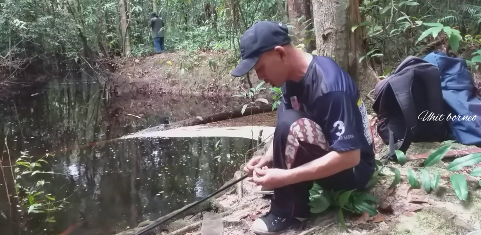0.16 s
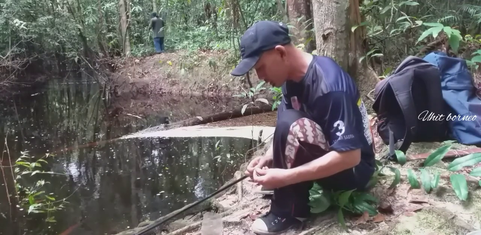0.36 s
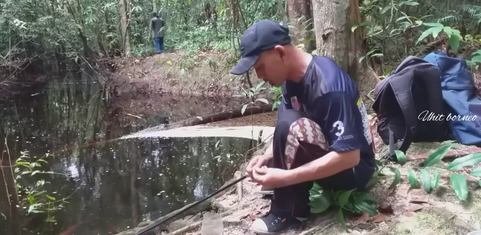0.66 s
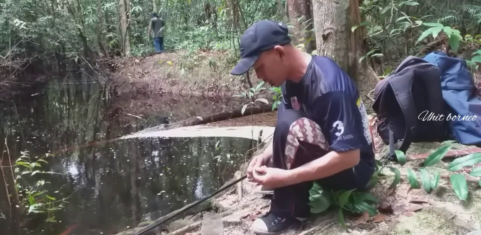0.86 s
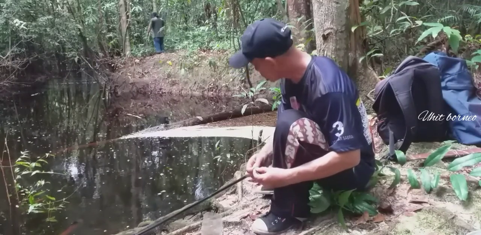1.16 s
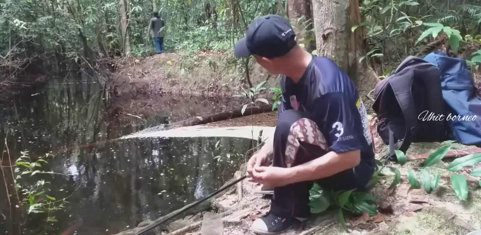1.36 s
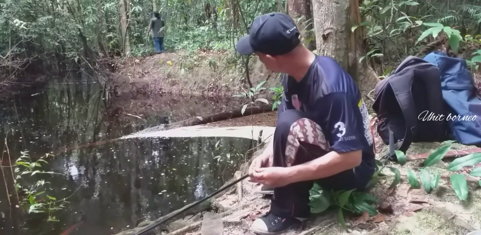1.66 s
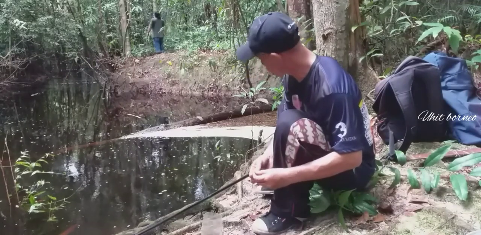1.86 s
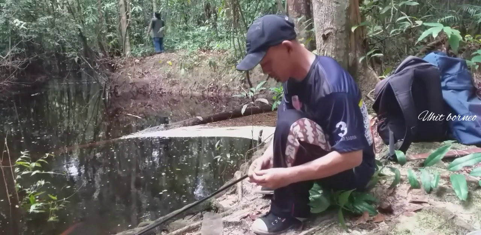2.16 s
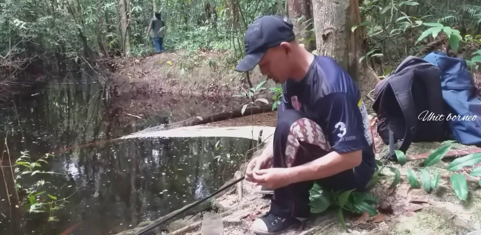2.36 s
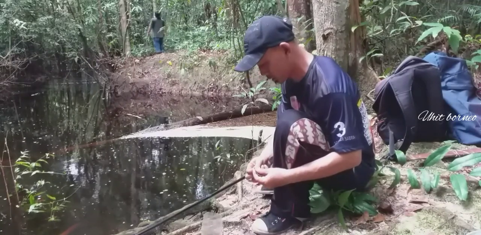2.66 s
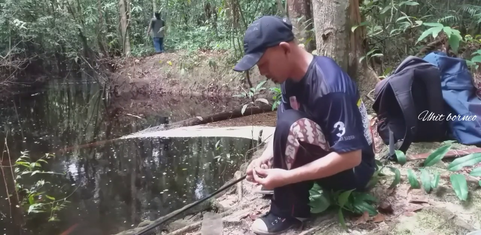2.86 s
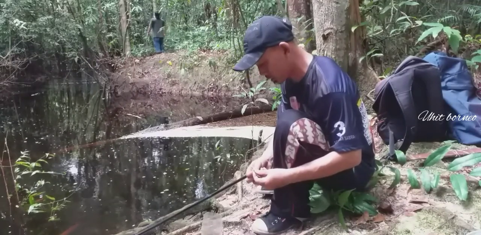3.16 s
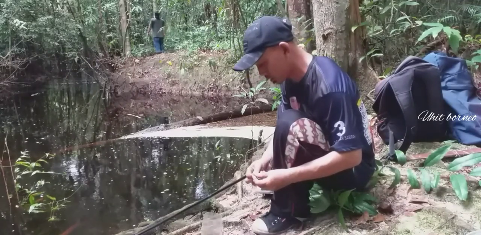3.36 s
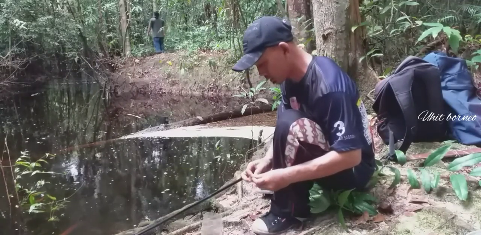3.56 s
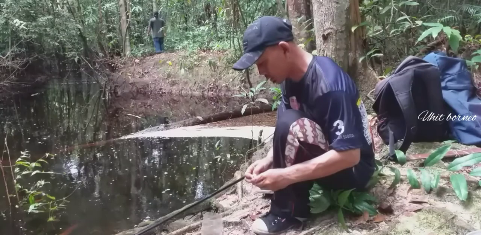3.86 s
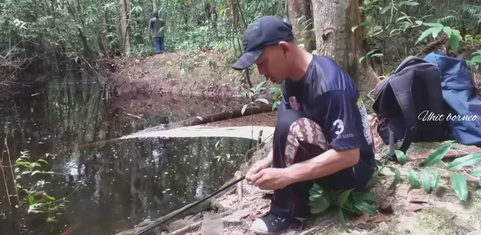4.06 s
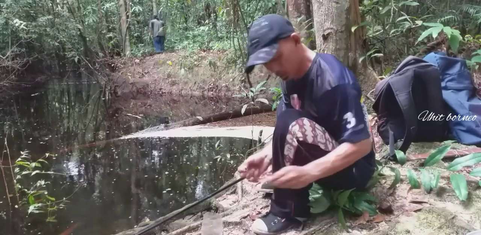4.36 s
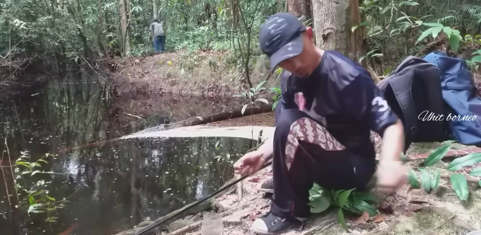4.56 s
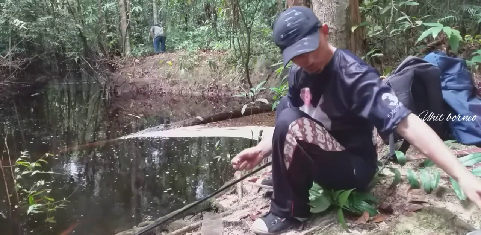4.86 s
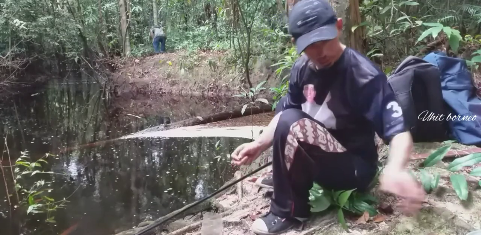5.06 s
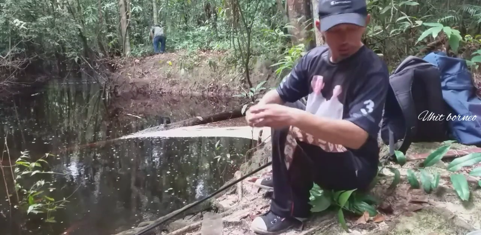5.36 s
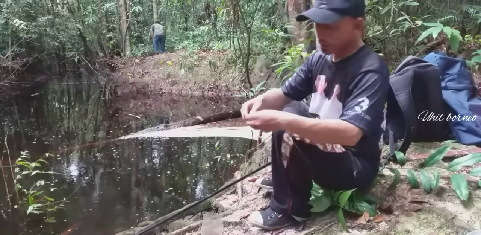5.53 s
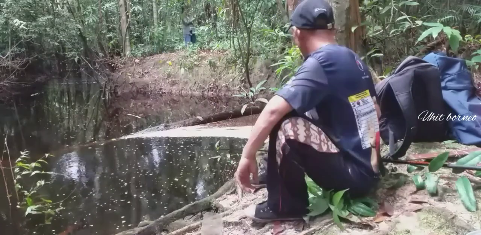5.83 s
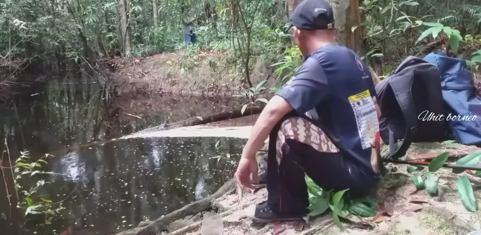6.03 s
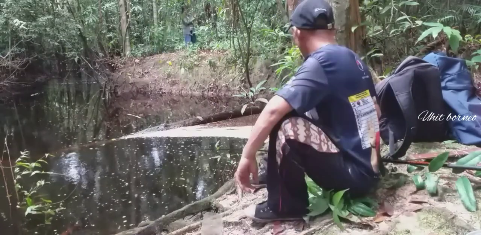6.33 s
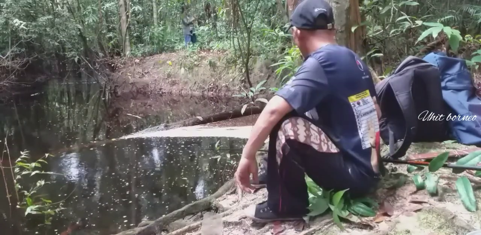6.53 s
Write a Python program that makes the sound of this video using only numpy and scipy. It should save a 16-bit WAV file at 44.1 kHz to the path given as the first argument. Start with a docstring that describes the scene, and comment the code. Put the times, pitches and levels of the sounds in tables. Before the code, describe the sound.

A shrill cicada chorus rings steadily for the whole six and a half seconds, a dense, faintly buzzing hiss around 6 to 7 kHz with a weaker overtone above, over barely audible low rumble and wash. Far, blurred bird notes and light leaf rustling hide beneath it from the start, and a tiny gulp glides upward at 0.35. A bush cricket makes four soft, very high rasps at about 1.2, 1.6, 2.0 and 2.4. A near bird chirps at 1.95 to 2.1, one slur down and two quick flicks up, echoed by the trees. A thin insect whines almost inaudibly near 3.9 and from 6.3. At 4.9 two sharp ticks open a short, bright splash that turns hollow, with small ringing bubbles until about 5.0. Scattered ticks follow, with a snap and dry leaf crackle near 5.4, and a last faint tick at 5.8. The chorus eases very slightly at the end.

```python
"""A cicada chorus drones as ringing click noise over rumble and wash; leaves rustle as fine crackle.
Far birds call in blurred notes from the start, and a low sine gulp glides up from a still pond.
A bush cricket then rasps four times in sliding noise, damped snaps tick, a near bird chirps in three sine slurs.
A thin insect whines twice in fuzzy noise; between, droplet crackle and ringing bubbles splash.
Trees echo the water, leaves, birds and bush cricket; opposed faint hiss widens a nearly mono pair."""
import sys
import numpy as np
from scipy import signal
from scipy.fft import rfft, irfft
from scipy.io import wavfile
from scipy.ndimage import uniform_filter1d

SR = 44100
rng = np.random.default_rng(int(sys.argv[2]) if len(sys.argv) > 2 else 0)


def log_audio(samples):
    """Write samples as a 16-bit WAV file to the path given in sys.argv[1]."""
    # one column per channel
    frames = np.atleast_2d(samples).T
    # limit to full scale, then quantise
    limited = np.clip(frames, -1, 1)
    pcm = np.round(limited * 32767).astype(np.int16)
    wavfile.write(sys.argv[1], SR, pcm)


N = 295029
TIME_S = np.arange(N) / SR

# Low forest rumble and faint wash: (frequency [Hz], relative density [dB])
AIR_SPECTRUM = [(15, -52), (25, -30), (38, -12), (91, 1), (182, -7.5), (217, -14.5), (247, -12), (328, -15),
                (736, -17.5), (876, -18.5), (1650, -20), (2290, -19.5), (2440, -20), (4600, -19),
                (5980, -51), (10100, -120)]
# Cicadas' ringing tymbals: (frequency [Hz], relative density [dB])
TYMBAL_SPECTRUM = [(2710, -58), (4600, -38), (5090, -28.5), (5460, -25), (6290, -1.5), (6700, 3),
                   (7010, -2), (7470, -9), (8310, -18), (8770, -23.5), (9460, -41), (9800, -35),
                   (12700, -75), (21600, -120)]
# Tymbal overtone an octave up: (frequency [Hz], relative density [dB])
OVERTONE_SPECTRUM = [(5590, -56), (9500, -27.5), (10200, -29), (11100, -25.5), (12500, -5), (13200, 2.5),
                     (14000, -2), (15600, -20.5)]
# Effort of the whole chorus: (time [s], level [dB])
CHORUS_EFFORT = [(1.0, -46), (2.9, -45), (5.4, -45), (6.3, -46.6)]
# Nearest cicadas: (frequency [Hz], width per filter stage [Hz], level against the ring [dB])
CICADA_DRONES = [(6310, 56, -21.5), (6473, 66, -12.5)]
# Faint side hiss: (frequency [Hz], relative density [dB])
SIDE_HISS_SPECTRUM = [(100, -18), (500, -5.5), (1500, -1), (4000, 2), (6500, -22.5), (10500, 0),
                      (15000, 3.5)]
# Brushes through dry leaves: (loudest time [s], rise and fall scale [s], level [dB])
LEAF_BRUSHES = [(.35, 0.31, -72.5), (1.395, 0.01, -71.5), (1.65, 0.27, -73.5), (3.43, .049, -66),
                (4.8, 0.065, -70), (5.11, .03, -64), (5.398, 0.041, -49.5), (5.52, 0.12, -68)]
# Dry-leaf crackle: (frequency [Hz], relative density [dB])
LEAF_SPECTRUM = [(300, -28), (560, -17.5), (1300, -24), (2100, -9), (3400, -7.5), (4450, -1.5), (6500, -5),
                 (9000, -13.5), (12000, -9.5), (15500, -26)]
# Far bird notes: (start [s], length [s], mid pitch [Hz], width per filter stage [Hz], level [dB])
FAR_BIRD_NOTES = [(0.046, 0.033, 2130, 200, -77), (0.63, 0.09, 740, 219, -73.5),
                  (0.706, 0.074, 1897, 280, -71.5), (1.626, 0.13, 2340, 700, -81),
                  (2.24, 0.075, 4220, 600, -71), (2.939, 0.1, 4450, 1100, -69),
                  (4.853, 0.065, 1790, 130, -69.5), (5.469, .078, 2430, 600, -73)]
# Bush cricket strokes: (start [s], level [dB])
CRICKET_STROKES = [(1.168, -46), (1.637, -46), (1.962, -45.5), (2.44, -45.5)]
# Brief ticks: (start [s], level [dB], ringing frequency [Hz])
TICKS = [(4.9132, -23, 12000), (4.9171, -23, 8300), (4.9193, -29, 8000), (1.395, -58, 4600),
         (3.417, -57, 3200), (4.8015, -51, 9500), (4.9775, -38, 4800), (5.0455, -43, 11000),
         (5.1715, -53, 4700), (5.217, -48, 9000), (5.384, -34, 4500), (5.7998, -51, 2600)]
# Near bird, a slur down and two flicks up; bend > 1 glides late:
# (start [s], length [s], first pitch [Hz], last pitch [Hz], bend [1], swell [s], level [dB])
CHIRP_SLURS = [(1.938, .08, 7470, 6650, 3.5, 0.051, -37.5), (2.009, 0.028, 6680, 7210, 2.5, .008, -35),
               (2.042, 0.056, 7650, 8367, 0.297, 0.0096, -32)]
# Thin insect's songs: (start [s], time to fall-off [s], level [dB])
THIN_SONGS = [(3.85, 0.28, -74), (6.297, .45, -69)]
# Splash slap, closing cavity, slosh, falling drops; depth runs from bright spray to hollow slosh:
# (start [s], rise [s], fall [s], level [dB], depth [0-1])
SPLASH_SURGES = [(4.905, 0.015, 0.013, -39.5, 0.01), (4.926, 0.029, 0.02, -44, 0.64),
                 (4.968, 0.019, 0.056, -58.5, 1), (4.992, .005, 0.0069, -61, .3)]
# Bright spray: (frequency [Hz], relative density [dB])
SPRAY_SPECTRUM = [(200, -42), (1500, -19), (3500, -7), (6000, 5), (11000, -6.5), (15500, -7)]
# Hollow slosh: (frequency [Hz], relative density [dB])
SLOSH_SPECTRUM = [(120, -32), (330, -5.5), (650, -2), (1300, -11.5), (1700, -11), (2500, -7), (5000, -3.5),
                  (8000, -40), (15000, -32)]
# Largest air pockets of the splash: (start [s], starting pitch [Hz], level [dB])
AIR_POCKETS = [(4.909, 1410, -54), (4.911, 3770, -48), (4.937, 586, -51), (4.943, 4420, -41),
               (4.952, 2050, -44.5), (4.955, 1350, -47.5), (4.975, 1208, -49), (4.976, 846, -50.5),
               (4.977, 670, -47), (4.979, 490.6, -54.5), (4.982, 399, -55.5), (4.995, 2800, -53),
               (4.995, 5380, -41.5)]
# Decay of the trees' echoes: (frequency [Hz], t60 [s])
FOREST_DECAY = [(200, 0.45), (1000, 0.17), (2500, 0.78), (8000, 0.79), (15000, 0.73)]

AIR_DB = -73
FAR_SAG_SHARE = .03  # fall across each far note, as a share of its pitch
GULP_START_S, GULP_DB, GULP_RISE_S, GULP_FALL_S = .332, -58, .038, 0.022
GULP_START_HZ, GULP_OCTAVES_PER_S, GULP_TOP_HZ = 140, 25, 464
STROKE_RISE_S, STROKE_HOLD_S, STROKE_FALL_S = 0.029, 0.064, 0.0088
STROKE_HIGH_HZ, STROKE_LOW_HZ, SLIDE_AT_S, SLIDE_S = 15200, 10400, 0.057, 0.016
TICK_RING_S = .00008
CHIRP_FALL_S = .004
THIN_RISE_S, THIN_FALL_S = 0.074, .14
# Swell and life at 1 kHz; both shorten by a power of pitch
BUBBLE_SWELL_S, BUBBLE_LIFE_S, BUBBLE_POWER, BUBBLE_RISE_OCTAVES = 0.0024, 0.054, 0.84, 0.053
EDGE_HZ = 15750


def amp(db):
    """Decibels to gain."""
    return 10 ** (np.asarray(db) / 20)


def evened(x):
    """Scales to rms 1."""
    return x / np.sqrt(np.mean(x ** 2) + 1e-20)


def read(points, hz):
    """Interpolates a table on a log-frequency axis."""
    points_hz, value = np.transpose(points)
    return np.interp(np.log(hz + 1), np.log(points_hz + 1), value)


def add(mix, start_s, sound):
    """Mixes a sound in at start_s."""
    part = mix[max(round(start_s * SR), 0):][:len(sound)]
    part += sound[:len(part)]


def sine(hz):
    """Sine that follows the pitch curve hz."""
    return np.sin(2 * np.pi * np.cumsum(hz) / SR)


def envelope(t_s, rise_s, hold_s, fall_s):
    """Rises smoothly from t_s = 0, then dies exponentially from hold_s on."""
    rise = np.sin(np.pi / 2 * np.clip(t_s / rise_s, 0, 1)) ** 2
    return rise * np.exp(-np.maximum(t_s - hold_s, 0) / fall_s)


def coloured(x, spectrum):
    """Filters x by a spectrum, at rms 1."""
    gain = amp(read(spectrum, np.fft.rfftfreq(N, 1 / SR)))
    return evened(irfft(rfft(x) * gain, N))


def drift(rate_hz):
    """Slow random curve of rms 1: noise under a Gaussian lowpass."""
    lowpass = np.exp(-(np.fft.rfftfreq(N, 1 / SR) / rate_hz) ** 2)
    return evened(irfft(rfft(rng.standard_normal(N)) * lowpass, N))


def whistle(hz, stage_width_hz):
    """Noise in a steep three-stage resonance that follows the curve hz, at rms 1."""
    pole = np.exp(-np.pi * stage_width_hz / SR)
    z = rng.standard_normal(len(hz)) + 1j * rng.standard_normal(len(hz))
    for _ in range(3):
        z = signal.lfilter([1 - pole], [1, -pole], z)
    carrier = np.exp(2j * np.pi * np.cumsum(hz) / SR)
    return evened((z * carrier).real)


def crackle(impacts_per_s, spread_db):
    """Random impacts of either sign; a larger spread lets a few stand out."""
    size = amp(spread_db * np.minimum(rng.exponential(1, N), 4))
    return size * rng.choice([-1, 1], N) * (rng.random(N) < impacts_per_s / SR)


def forest(x, wet_db, first_s=.008):
    """Direct sound plus sparse echoes from trunks and leaves, dying band by band."""
    at = np.arange(0, SR - 20, 20)
    taps = np.zeros(SR)
    taps[at + rng.integers(0, 20, len(at))] = rng.choice([-1., 1.], len(at)) * (at > first_s * SR)
    hz, t_s, z = signal.stft(taps, SR, nperseg=256)
    decay = np.exp(-np.log(1000) * t_s / read(FOREST_DECAY, hz)[:, None])
    tail = signal.istft(z * decay, SR, nperseg=256)[1]
    echoes = signal.fftconvolve(x, tail / np.linalg.norm(tail))[:N]
    return (x + amp(wet_db) * echoes) / np.hypot(1, amp(wet_db))


def air():
    """Steady low rumble and a faint wash in which far trickles and leaves come and go in patches."""
    hz, _, z = signal.stft(rng.standard_normal(N), SR, nperseg=1024, noverlap=768)
    patchy_db = np.interp(hz, [200, 1200], [.3, 1.7])[:, None]
    patches = uniform_filter1d(rng.standard_normal(z.shape), size=7, axis=0)
    patches = evened(uniform_filter1d(patches, size=14, axis=1))
    wash = signal.istft(z * amp(patchy_db * patches), SR, nperseg=1024, noverlap=768)[1][:N]
    return amp(AIR_DB) * coloured(wash, AIR_SPECTRUM)


def cicadas(overtone_db=-10, brightening=1.5, flutter_db=0.44):
    """Countless tymbal clicks merge into a ringing hiss; near singers add narrow drones, all faintly buzzing."""
    effort_db = np.interp(TIME_S, *np.transpose(CHORUS_EFFORT))
    buzz_hz = 72 + 2 * drift(4)
    buzz = 1 + .08 * np.cos(2 * np.pi * np.cumsum(buzz_hz) / SR)
    ring = coloured(crackle(15000, 0.36), TYMBAL_SPECTRUM)
    for hz, width_hz, db in CICADA_DRONES:
        ring += amp(db) * whistle(np.full(N, hz), width_hz)
    # harder singing raises the overtone faster than the main ring
    lift_db = (brightening - 1) * (effort_db - effort_db.mean())
    overtone = amp(overtone_db + lift_db) * coloured(crackle(15000, 0.85), OVERTONE_SPECTRUM)
    return amp(effort_db + flutter_db * drift(32)) * buzz * (ring + overtone)


def rustles():
    """Fine crackle of dry leaves, swelling and fading with the pressure of each brush."""
    pressure = np.zeros(N)
    for peak_s, scale_s, db in LEAF_BRUSHES:
        pressure += amp(db) / np.cosh(np.clip((TIME_S - peak_s) / scale_s, -20, 20) * np.sqrt(2))
    return pressure * coloured(crackle(2500, 4), LEAF_SPECTRUM)


def far_birds():
    """Short sagging notes, blurred into narrow noise, with echoes as strong as the direct sound."""
    out = np.zeros(N)
    for start_s, length_s, pitch_hz, width_hz, db in FAR_BIRD_NOTES:
        hz = pitch_hz * (1 + FAR_SAG_SHARE * np.linspace(.5, -.5, round(length_s * SR)))
        add(out, start_s, amp(db) * whistle(hz, width_hz) * signal.windows.tukey(len(hz), .5))
    return forest(out, wet_db=0.0)


def gulp(rough=0.44):
    """A large air pocket at the pond's surface shrinks as it opens, so its unsteady note glides up."""
    t_s = np.clip(TIME_S - GULP_START_S, 0, 1)
    hz = np.minimum(GULP_START_HZ * 2 ** (GULP_OCTAVES_PER_S * t_s), GULP_TOP_HZ)
    tone = sine(hz) + rough * whistle(hz, stage_width_hz=260)
    return amp(GULP_DB) * envelope(t_s, GULP_RISE_S, GULP_RISE_S, GULP_FALL_S) * tone


def bush_cricket(stage_width_hz=3100):
    """Each wing stroke scrapes a resonance that slides down from the edge of hearing."""
    out, t_s = np.zeros(N), TIME_S[:SR // 4]
    slide = (1 + np.tanh((t_s - SLIDE_AT_S) / SLIDE_S)) / 2
    hz = STROKE_HIGH_HZ + (STROKE_LOW_HZ - STROKE_HIGH_HZ) * slide
    stroke = envelope(t_s, STROKE_RISE_S, STROKE_HOLD_S, STROKE_FALL_S)
    for start_s, db in CRICKET_STROKES:
        add(out, start_s, amp(db) * stroke * whistle(hz, stage_width_hz))
    return forest(out, wet_db=6.5)


def ticks(scatter_s=0.0033, scatter_db=-21):
    """A brief damped snap with a short scatter behind it, thin in the bass."""
    out, t_s = np.zeros(N), np.arange(512) / SR
    for start_s, db, hz in TICKS:
        # the derivative thins the bass
        snap = np.gradient(t_s * np.exp(-t_s / TICK_RING_S) * np.sin(2 * np.pi * hz * t_s))
        scatter = amp(scatter_db) * rng.standard_normal(len(t_s)) * np.exp(-t_s / scatter_s)
        scatter *= t_s > 4 * TICK_RING_S
        tick = snap + np.convolve(scatter, snap)[:len(t_s)]
        add(out, start_s, amp(db) * tick / abs(snap).max())
    return out


def near_bird(trunks_db=-3):
    """Three nearly pure slurs; close trunks repeat them and the forest draws them out into a tail."""
    chirp, waver = np.zeros(N), 1 + .0015 * drift(150)
    for start_s, length_s, first_hz, last_hz, bend, swell_s, db in CHIRP_SLURS:
        hz = first_hz + (last_hz - first_hz) * np.minimum(TIME_S / length_s, 1) ** bend
        tone = np.sqrt(2) * sine(hz * waver)
        add(chirp, start_s, amp(db) * envelope(TIME_S, swell_s, length_s, CHIRP_FALL_S) * tone)
    delays_s = rng.uniform(.006, .05, size=12)
    trunks = sum(np.roll(chirp, round(s * SR)) for s in delays_s) / np.sqrt(len(delays_s))
    return forest((chirp + amp(trunks_db) * trunks) / np.hypot(1, amp(trunks_db)), wet_db=-6.5)


def thin_insect(pitch_hz=11100, stage_width_hz=1300):
    """A far, fuzzy whine of resonant noise between the cicadas' two bands."""
    level = np.zeros(N)
    for start_s, hold_s, db in THIN_SONGS:
        level += amp(db) * envelope(TIME_S - start_s, THIN_RISE_S, hold_s, THIN_FALL_S)
    return level * whistle(np.full(N, pitch_hz), stage_width_hz)


def splash(clumping_db=3.5):
    """A crash of droplets that land in clumps, bright at the slap and hollower as the water closes."""
    spray = coloured(crackle(2500, 3.8), SPRAY_SPECTRUM)
    slosh = coloured(crackle(3000, 3), SLOSH_SPECTRUM)
    water = np.zeros(N)
    for start_s, rise_s, fall_s, db, depth in SPLASH_SURGES:
        blend = np.sqrt(1 - depth) * spray + np.sqrt(depth) * slosh
        water += amp(db) * envelope(TIME_S - start_s, rise_s, rise_s, fall_s) * blend
    return amp(clumping_db * drift(150)) * water


def bubbles():
    """Each air pocket swells, rings and rises in pitch as it nears the surface; large ones are low and slow."""
    out, t_s = np.zeros(N), TIME_S[:SR // 2]
    for start_s, hz, db in AIR_POCKETS:
        quickness = (hz / 1000) ** BUBBLE_POWER
        swell_s, life_s = BUBBLE_SWELL_S / quickness, BUBBLE_LIFE_S / quickness
        pitch_hz = hz * 2 ** (BUBBLE_RISE_OCTAVES * np.minimum(t_s / life_s, 1))
        # rings down to 1/30 in one life
        ring = envelope(t_s, swell_s, swell_s, life_s / np.log(30))
        add(out, start_s, amp(db) * ring * sine(pitch_hz))
    return out


def scene(side_hiss_db=-87, pond_wet_db=-8, leaves_wet_db=-13):
    """Insects and birds in the trees, water and leaves close by; left and right differ only by opposed faint hiss."""
    pond = forest(bubbles() + gulp(), wet_db=pond_wet_db)
    spray_leaves_ticks = forest(splash() + rustles() + ticks(), wet_db=leaves_wet_db)
    insects = cicadas() + thin_insect() + bush_cricket()
    birds = near_bird() + far_birds()
    mid = insects + birds + pond + spray_leaves_ticks + air()
    side = amp(side_hiss_db) * coloured(rng.standard_normal(N), SIDE_HISS_SPECTRUM)
    return np.array([mid + side, mid - side])


def record(dry):
    """The recorder's steep upper band limit, a linear-phase lowpass."""
    lowpass = signal.firwin(1023, EDGE_HZ, window=("kaiser", 9), fs=SR)
    return signal.oaconvolve(dry, lowpass[None], "same")


dry = scene()
out = record(dry)
log_audio(out)
```